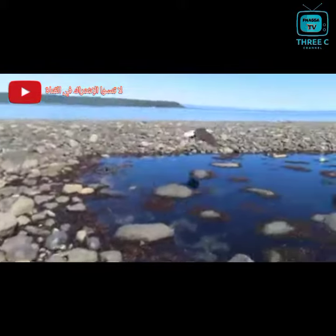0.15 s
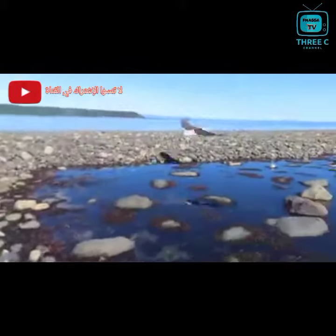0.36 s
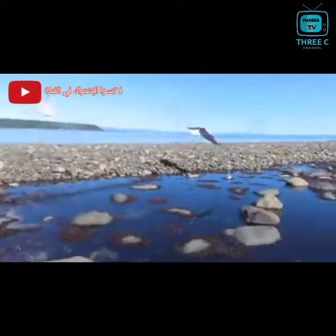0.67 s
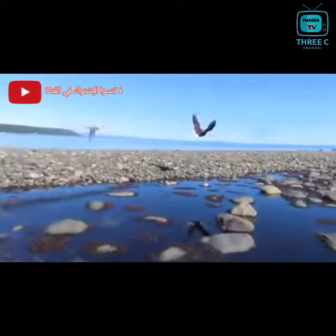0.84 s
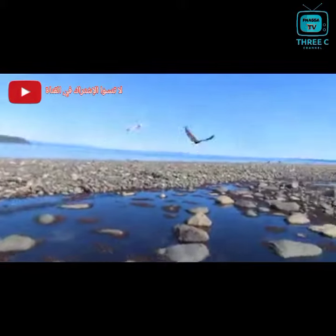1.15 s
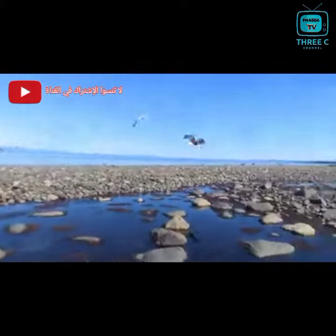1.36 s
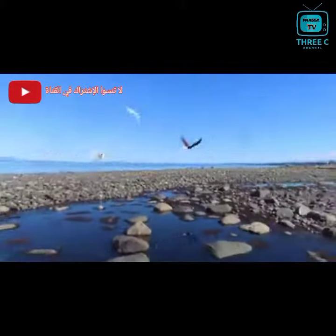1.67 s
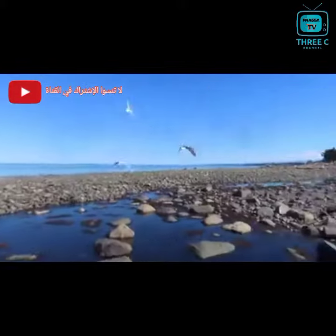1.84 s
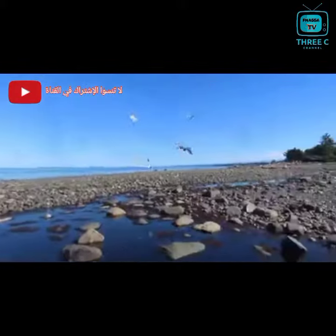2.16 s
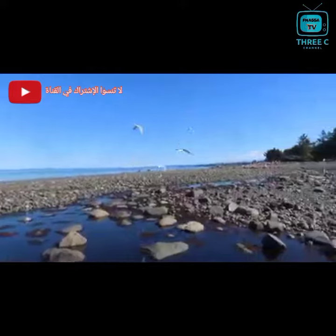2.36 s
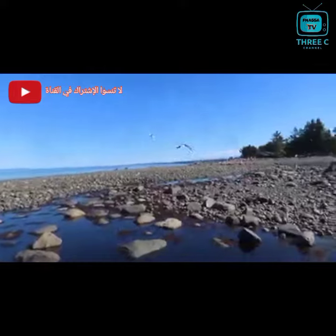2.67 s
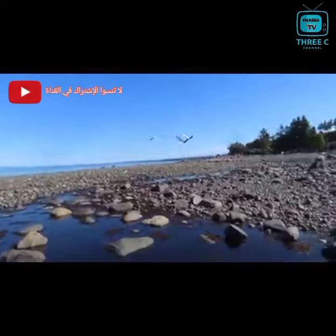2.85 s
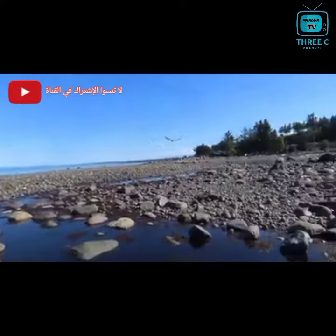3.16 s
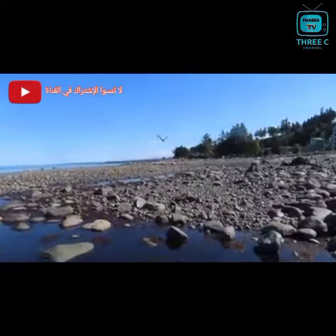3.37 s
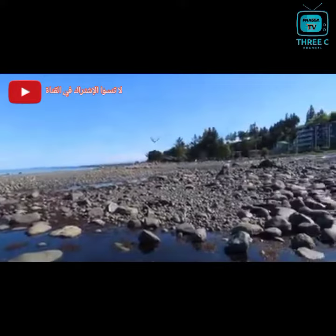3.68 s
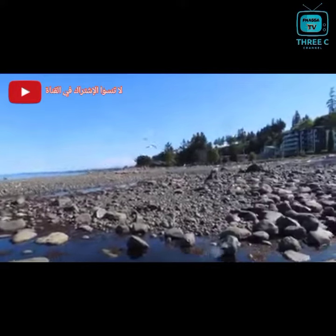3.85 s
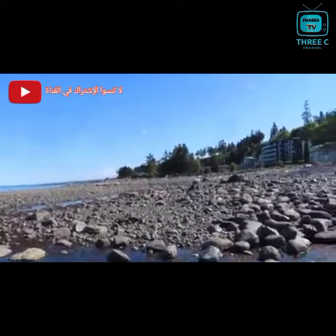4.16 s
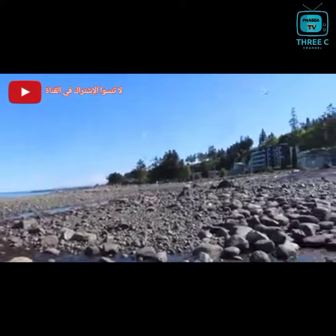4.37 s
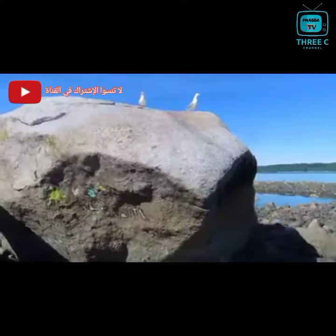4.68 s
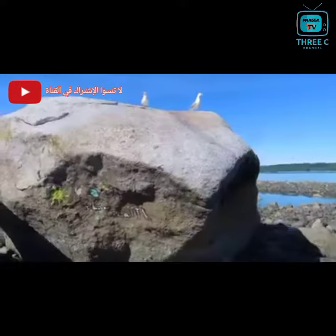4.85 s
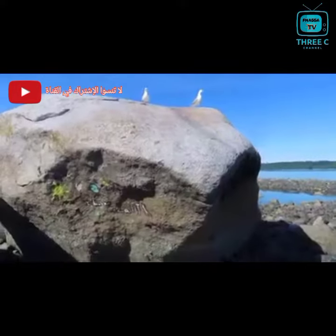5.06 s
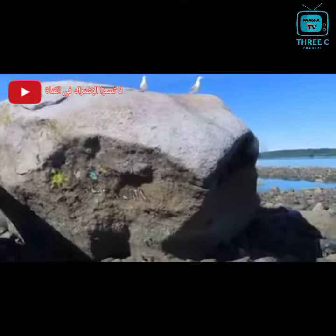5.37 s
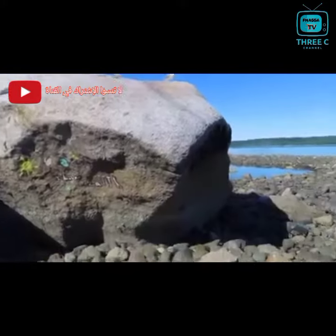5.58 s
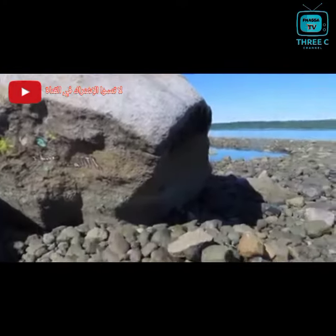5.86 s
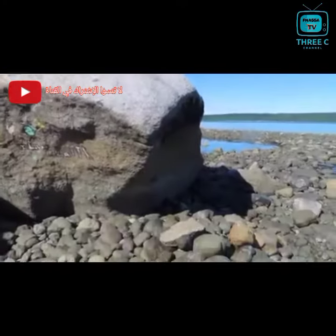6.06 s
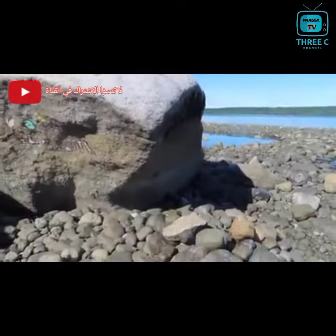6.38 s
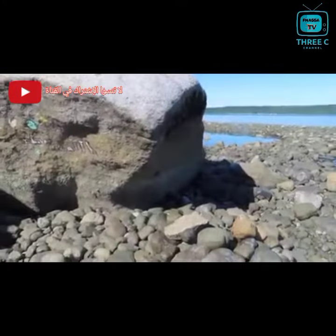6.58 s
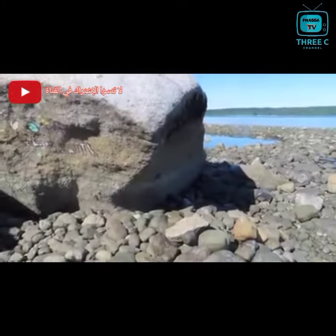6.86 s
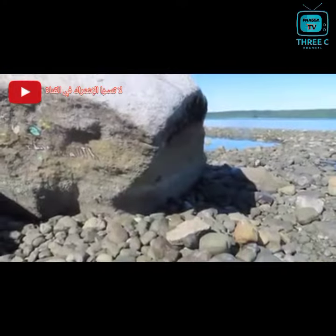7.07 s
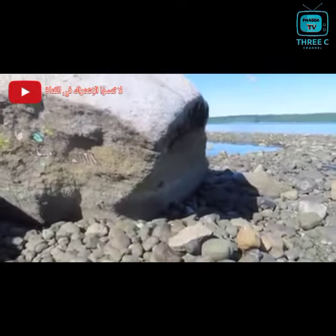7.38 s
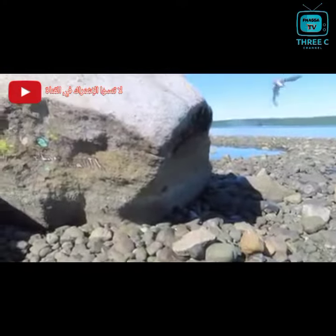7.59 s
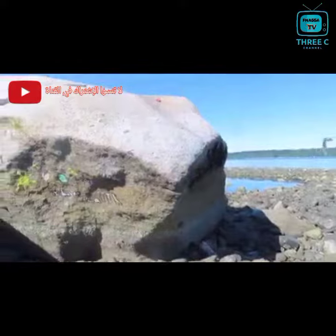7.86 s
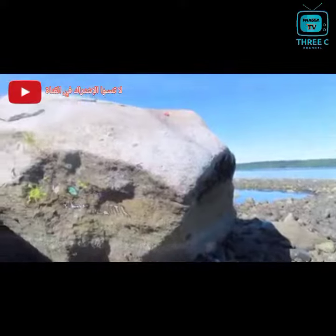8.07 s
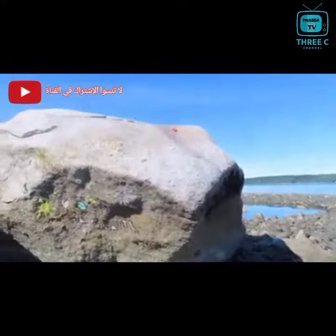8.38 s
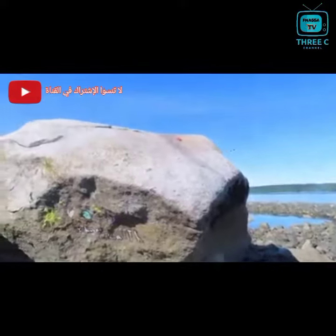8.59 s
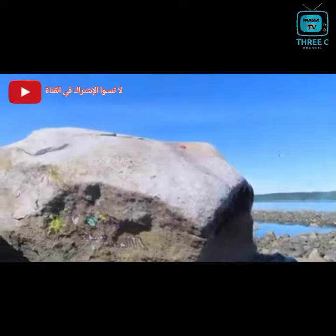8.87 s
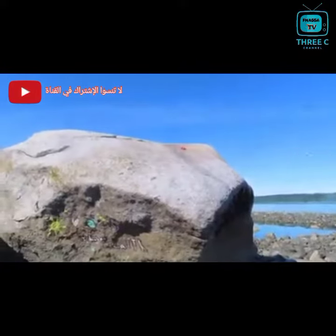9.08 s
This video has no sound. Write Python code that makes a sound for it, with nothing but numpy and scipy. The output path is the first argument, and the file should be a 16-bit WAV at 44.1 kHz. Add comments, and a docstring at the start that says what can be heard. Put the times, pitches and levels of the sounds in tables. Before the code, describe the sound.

Gulls cry in raspy, falling calls over a calm pebble shore with wind buffets, then after a brief cut a low motor drones beneath.

```python
"""Gulls cry over a pebble shore, often two at once: some cries start raspy and then clear, others snap on clear;
most fall in pitch. Every cry is a harmonic series shaped by the throat; filtered noise forms its echo, the wash
of a calm sea and the wind buffeting the microphone. After a short near-silent cut the listener stands by a boulder:
a motor, probably a boat's, drones in low harmonics until its level drops, under a faint whistle and one tick."""
import sys
import numpy as np
from scipy import signal
from scipy.fft import rfft, irfft, next_fast_len
from scipy.io import wavfile
from scipy.ndimage import uniform_filter1d

SR = 44100
rng = np.random.default_rng(int(sys.argv[2]) if len(sys.argv) > 2 else 0)


def pcm_store(signal):
    """Save signal as 16-bit PCM."""
    levels = np.round(np.clip(np.atleast_2d(signal), -1, 1) * 32767)
    wavfile.write(sys.argv[1], SR, levels.astype(np.int16).T)


N = 407043
TIME = np.arange(N) / SR
CUT_START_S, CUT_END_S, TICK_S = 4.63, 4.824, 6.7935
TOP_HZ = 15500

# Spectra of sea, flutter, rumble, turbulence and hiss are relative: their noise is scaled to rms 1.
# sea on the open shore and by the boulder: freq_hz, density_db
SEA_OPEN_SPECTRUM = [(24, -46.5), (40, -29.5), (80, -3), (174, -7), (218, -11.5), (461, -25.5),
                     (522, -20.5), (1020, -18.5), (1160, -19.5), (1410, -18), (1730, -28), (3140, -32.5),
                     (3470, -39), (15500, -62)]
SEA_BOULDER_SPECTRUM = [(210, -12), (350, -6), (488, -7.5), (936, -4.5), (1460, -11), (1760, -14.5),
                        (1940, -17), (2270, -20), (2890, -26), (4570, -31.5), (5890, -38), (8620, -43),
                        (15500, -62)]
SEA_OPEN_DB, SEA_BOULDER_DB = -38, -39.5
# hiss of water: freq_hz, density_db
HISS_SPECTRUM = [(800, 0.5), (2500, 12), (5000, 5), (9000, -2), (13000, -10.5), (16000, -21.5)]
# strength of the wash: time_s, gain_db
WASH_STRENGTH = [(0, 2.5), (.6, 0), (2, -6), (3, 2), (4.6, 1), (7.5, -1), (9.2, 0.6)]
# soft swells of hiss: centre_s, half_length_s, level_db
HISS_SWELLS = [(0.09, 0.093, -48.5), (0.323, 0.068, -50), (0.438, 0.035, -49), (0.574, 0.071, -49),
               (2.909, 0.22, -56.5), (6.02, 0.16, -49.5), (7.453, 0.8, -58.5)]

# wind flutter, deep rumble and gust turbulence: freq_hz, density_db
FLUTTER_SPECTRUM = [(35, -39.5), (60, -25.5), (128, -2), (238, -1), (277, -4), (340, -8), (455, -12.5),
                    (530, -24), (800, -35.5), (1040, -52.5), (1760, -120)]
RUMBLE_SPECTRUM = [(15, -19.5), (40, 12.5), (70, 3.5), (120, 11.5), (200, 4), (400, -44), (1500, -79)]
TURBULENCE_SPECTRUM = [(20, -18.5), (45, -7.5), (100, -6), (180, -5.5), (300, -13), (500, -35),
                       (3000, -89.5)]
# steady breeze, each row holding until the next: start_s, flutter_db, rumble_db
BREEZE_LEVELS = [(0, -56.5, -66), (4.7, -42.5, -42.5), (8.21, -37.5, -54)]
# gusts: centre_s, half_length_s, flutter_db, rumble_db, turbulence_db (at each port)
GUST_EVENTS = [ (1.1, 0.21, -45.5, -47, -81), (2.634, 0.15, -35, -43, -65), (2.829, 0.085, -24.5, -46, -57),
               (3.083, 0.096, -27.5, -41, -58), (3.436, .22, -32, -56, -70), (3.975, 0.082, -35, -45, -70),
               (4.12, 0.071, -53, -35, -74), (4.592, .14, -44.5, -41, -66), (4.95, 0.22, -33.5, -45, -34.5),
               (5.45, 0.51, -37.5, -56, -59), (5.75, 0.11, -44, -52, -42), (6.72, 0.092, -45, -36, -34),
               (7.1, 0.054, -50, -46, -39), (7.763, 0.068, -32.5, -39, -22), (8.064, 0.11, -38, -34, -22),
               (8.18, 0.024, -28, -45, -12), (8.98, 0.21, -21.5, -38, -54), (9.2, 0.091, -34, -50, -54), ]
# single buffets: start_s, peak_db, pitch_hz, length_s
BUFFET_EVENTS = [(2.659, -18.5, 226, 0.01), (2.805, -16, 191, 0.032), (3.422, -20.5, 228, 0.027),
                 (3.49, -27, 198, 0.011), (3.61, -20, 208, 0.015), (7.748, -10.5, 85.4, 0.053),
                 (8.028, -11.5, 93, 0.1), (8.698, -15, 213, 0.023)]

# thin far whistle: time_s, pitch_hz, level_db
WHISTLE_TRACK = [(4.8, 4600, -67), (5.2, 4560, -64), (5.9, 4550, -60), (6.1, 4550, -84), (8.55, 4490, -84),
                 (8.75, 4490, -58), (9.2, 4500, -77)]
# the motor: time_s, cycle_rate_hz, level_db
MOTOR_TRACK = [(4.8, 18.8, -18.5), (5.5, 20.1, -23), (6, 18.4, -22.5), (6.8, 17.3, -18), (7.5, 17.1, -18.5),
               (8, 18.1, -22.5), (8.2, 18.6, -16), (8.22, 18.4, -31.5), (9.23, 18.6, -32)]
# motor harmonics: multiple (of the cycle rate), level_db (relative)
MOTOR_HARMONICS = [(3, -17), (4, -7.5), (5, -4.5), (6, -13.5), (7, -6.5), (8, -13.5), (9, -15), (10, -18),
                   (11, -22.5), (12, -22.5), (14, -24.5)]
# exhaust rumble: freq_hz, density_db
EXHAUST_SPECTRUM = [(25, -27.5), (60, 0.5), (160, -2.5), (240, -13), (500, -34.0), (1500, -78.5)]
# crack and bright rattle of the tick: freq_hz, density_db
CRACK_SPECTRUM = [(300, 2), (1200, 1), (2600, 3.5), (5000, -9), (10000, -7.5), (16000, -23)]
RATTLE_SPECTRUM = [(5000, -5), (9000, 2), (15000, -15)]

# one row per voice of a cry: start_s, rise_s, fall_s, crest_hz, end_hz, fall_bend (1 straight, higher = later),
# level_db, fade_db (by the end), beak_db (opening), edge_db (of the voice), gape_db (wider in mid-fall),
# rasp_s (opening), hoarseness (0-1), leap_after_s, leap_for_s
CRY_VOICES = [ (0.0, 0.0023, 0.14, 1297, 930, 1.25, -22.5, 18.7, 14.5, 18, -5.5, 0.00071, 0.29, 0, 0),
              (0.656, 0.042, 0.19, 1402, 1130, 2.43, -17, 1, 15, 17, -6.5, .033, 0.13, .09, .2),
              (.67, 0.032, .245, 1357, 954, 2.8, -18, 9.4, 8, 11, 1, 0.029, 0.14, 0, .19),
              (.962, 0.022, 0.031, 1700, 1530, 0.53, -23, 16, 3.5, 13.5, -1.5, 0.019, 0.36, 0, 0.0041),
              (1.04, 0.0038, .19, 1496, 1084, 2.07, -24, 10.7, 6.5, 10, 3, 0.0044, 0, 0, 0),
              (1.334, 0.045, 0.23, 1302, 945, 2.7, -13.5, 14, 12.5, 19, -7, 0.042, 0.027, 0, 0.053),
              (2.168, 0.032, .222, 1303, 946, 3.55, -16, 13, 4, 0, 1.5, 0.046, 0.05, .124, 0.16),
              (2.276, 0.0084, 0.26, 1562, 1190, 2.47, -20, 18, -1.5, -8.5, 15, 0.047, 0.01, 0, 0),
              (3.005, 0.033, 0.016, 1650, 1590, 1, -32.5, 6, 7, -7, -2, 0.023, 0.6, 0, 0.0036),
              (3.058, 0.0019, 0.21, 1582, 1270, 1.57, -23.5, 16.4, 2.5, -8.5, 18.5, 0.0035, 0.07, 0, 0),
              (3.155, 0.1, .15, 1328, 950, 3.1, -27.5, 5, 10.5, 2.5, -3, 0.031, 0.21, 0, 0),
              (3.27, .02, 0.063, 1533, 1390, 2.2, -20.5, 2, 3.5, -10, 0, .002, 0.01, 0, 0),
              (3.496, 0.0054, .075, 1527, 1460, 2.7, -36, 13.5, -2.5, 1, 0, .002, 0.027, 0, 0),
              (3.585, 0.0054, .092, 1340, 1090, 1, -32, 11, 2.5, -11, 0, 0.018, .05, 0, 0.012),
              (3.728, 0.026, 0.017, 1630, 1620, 1.2, -41, 12, 7, 3, 0, .008, 0.7, 0, 0),
              (3.767, 0.0031, 0.21, 1553, 1275, 1.13, -25.5, 10, 1, -12, 9, 0.0096, 0.1, 0, 0),
              (4.095, 0.0048, .14, 1312, 997, .9, -33, 14, -1, 4, -1, 0.019, .08, 0, 0),
              (4.15, .005, .09, 1470, 1330, 1.5, -50, 6, 11, 20, 4, .005, .1, 0, 0.025),
              (4.613, 0.034, 0.015, 1396, 1390, 1, -38, 2.5, 0, -2.5, 2, 0.0064, 0.86, 0, 0),
              (4.821, 0.0031, 0.12, 1073, 760, 1.57, -17.5, 18.7, -1.5, 5.5, -1.5, .002, 0.14, 0, 0),
              (5.255, 0.092, 0.12, 1124, 803, 2.05, -15.5, 25, 2, -6.5, 1.5, 0.066, 0.066, .095, .13),
              (5.308, 0.074, .13, 1094, 765, 1.84, -18.5, 16, 2, 6, -3.5, 0.035, .05, 0, 0),
              (6.26, 0.095, .11, 1131, 760, 2.06, -15.5, 15, 6, 9.5, -7, 0.045, 0.017, 0, 0.0031),
              (8.189, .1, .128, 1320, 941, 0.95, -24.5, 8, 13, 12.5, -12, 0.048, 0.38, 0, 0.0061),
              (8.876, 0.028, 0.064, 1448, 1380, 0.67, -21, 2, 5, 7.5, -3, 0.033, 0.32, 0, 0),
              (8.947, .012, .12, 1584, 1363, 1.57, -25, 4, 6, 4, 0.5, .012, 0.1, 0, 0),
              (9.076, .003, 0.039, 1060, 970, 1, -34, 3, -6.5, -2, -1, .003, 0.4, 0, 0), ]
# resonances of a gull's throat: freq_hz, gain_db
THROAT_RESONANCE = [(700, 3.5), (1600, 0), (2100, -7), (2600, -17.5), (3200, -10.5), (4000, -25.5),
                    (5100, -35), (6200, -42), (7500, -49), (9000, -56), (11500, -56.5), (15000, -81.5)]
# beaming of the highest partials, by the way a bird faces: time_s, gain_db
FACING_BRIGHTNESS = [(0, 4), (1.5, -4), (2.2, -3.5), (4.3, -5), (4.8, 11.5), (6.4, 9), (8.2, -3),
                     (9.1, -4.5)]
# where the birds are: time_s, left_lead_samples, shade_db (treble, left minus right)
BIRD_BEARING = [(0, 1.5, -3.5), (.7, 2.5, -4.5), (.96, 0.6, 1), (1.33, 2.5, -4), (2.1, -1.5, -1.5),
                (6.3, -3, -1), (8.18, -2, .3)]
# colour of the beach's echoes: freq_hz, density_db
ECHO_SPECTRUM = [(300, -11), (1000, -12.5), (3200, 11.5), (6000, 9), (15000, -25.0)]
SCOOP_PER_S = 1.7  # a cry starts below its crest by this share per second of rise
LEAP = 1.13  # pitch ratio of the upper register
ONSET_DB = 18.5  # how far below full level the onset starts
FADE_BEND = 2.46  # the breath holds, then gives out
DYING_DB, DYING_BEND = 9, 11  # the last moment of a cry dies away quickly
BEAK_CLOSING, EDGE_SOFTENING = 0.66, 0.7  # dB of brightness lost per dB of effort lost
END_HOARSENESS = 0.28  # the voice frays as the breath gives out
GAPE_PEAK = 0.64  # share of the fall at which the gape is widest


def undb(db):
    """An amplitude ratio is ten to the power of its decibels over twenty."""
    return 10 ** (np.asarray(db) / 20)


def curve(rows, t=TIME):
    """Linear interpolation in time turns a table's columns into continuous quantities."""
    s, *columns = np.transpose(rows)
    return [np.interp(t, s, column) for column in columns]


def spectrum_db(points, hz):
    """A spectrum is interpolated linearly in decibels over logarithmic frequency."""
    f, db = np.transpose(points)
    return np.interp(np.log(np.maximum(hz, 1)), np.log(f), db)


def noise(points, size=N):
    """Filtering white noise by a spectrum gives coloured noise, here of rms 1."""
    n = next_fast_len(size)
    gain = undb(spectrum_db(points, np.fft.rfftfreq(n, 1 / SR)))
    coloured = irfft(rfft(rng.standard_normal(n)) * gain, n)[:size]
    return coloured / coloured.std()


def stereo_noise(points, side_db):
    """A shared noise plus an antiphase side noise sets the coherence of the two channels."""
    side = undb(side_db) * np.array([[1], [-1]])
    return noise(points) + side * noise(points)


def walk(rate, size=N):
    """Random levels, one each 1 / rate s, are joined by ramps into a slow fluctuation of spread near 1."""
    k = max(int(SR / rate), 1)
    held = np.repeat(rng.standard_normal(size // k + 2), k)
    slewed = np.sqrt(3 / 2) * uniform_filter1d(held, k)
    return slewed[rng.integers(k):][:size]


def bell(s, half):
    """A Gaussian envelope rises and falls smoothly around one moment."""
    return np.exp(-((TIME - s) / half) ** 2)


def sea(fizz_db=-67, lap_db=1.02):
    """Many small far waves sum to broadband noise; now and then a soft hiss swells."""
    wash_db, = curve(WASH_STRENGTH)
    open_shore = undb(SEA_OPEN_DB) * stereo_noise(SEA_OPEN_SPECTRUM, -44.0)
    boulder = undb(SEA_BOULDER_DB) * stereo_noise(SEA_BOULDER_SPECTRUM, -27.5)
    place = np.where(TIME < CUT_END_S, open_shore, boulder)
    wash = place * undb(wash_db + lap_db * walk(9))
    swell = sum(undb(db) * bell(s, half) for s, half, db in HISS_SWELLS)
    hiss = swell * stereo_noise(HISS_SPECTRUM, -14.5) * undb(1.4 * walk(60))
    # unrelated channels: a faint fizz of water from all around
    fizz = undb(fizz_db) * np.array([noise(HISS_SPECTRUM), noise(HISS_SPECTRUM)])
    return wash + fizz + hiss


def wind_strength():
    """Incoherent powers add, gust upon breeze: gains of flutter, deep rumble and port turbulence."""
    power = np.zeros((3, N))
    for s, flutter_db, rumble_db in BREEZE_LEVELS:
        power[:2, max(int(s * SR), 0):] = undb([[flutter_db], [rumble_db]]) ** 2
    for s, half, *levels_db in GUST_EVENTS:
        power += np.outer(undb(levels_db), bell(s, half)) ** 2
    return np.sqrt(power)


def wind(flutter, rumble, flutter_trim_db=-1, eddy_db=4.0):
    """Eddies flutter with a small difference between ports; deep rumble is common, and single buffets thump."""
    out = stereo_noise(FLUTTER_SPECTRUM, -27.0) * flutter * undb(flutter_trim_db + eddy_db * walk(35))
    out += noise(RUMBLE_SPECTRUM) * rumble
    for s, db, hz, length in BUFFET_EVENTS:
        age = np.arange(int(length * SR)) / SR
        unsteady_hz = hz * (1 + 0.31 * walk(150, len(age)))
        swing = np.sin(2 * np.pi * np.cumsum(unsteady_hz) / SR)
        thump = undb(db) * swing * np.sqrt(np.sin(np.pi * age / length))
        start = int(s * SR)
        port_gain = undb(0.53 * rng.standard_normal((2, 1)))
        out[:, start:start + len(age)] += thump * port_gain
    return out


def gusts(strength):
    """Local turbulence is incoherent between the two ports."""
    return np.array([noise(TURBULENCE_SPECTRUM), noise(TURBULENCE_SPECTRUM)]) * strength


def whistle(waver=0.011, flicker_db=3):
    """Random frequency and amplitude modulation make a thin far tone unsteady."""
    hz, db = curve(WHISTLE_TRACK)
    tone = np.sin(2 * np.pi * np.cumsum(hz * (1 + waver * walk(150))) / SR)
    return tone * undb(db + flicker_db * walk(17))


def motor(exhaust_db=-10, waver_db=2.5, wobble=0.091):
    """Uneven cylinders excite low multiples of the cycle rate, each wavering on its way over the water."""
    hz, db = curve(MOTOR_TRACK)
    phase = 2 * np.pi * np.cumsum(hz) / SR
    drone = 0
    for k, line_db in MOTOR_HARMONICS:
        gain = undb(line_db + waver_db * walk(5))
        drone = drone + gain * np.sin(k * phase + wobble * k / 4 * walk(12) + rng.normal(0, 1.0))
    # the exhaust rumbles between the lines, swelling once a cycle
    exhaust = stereo_noise(EXHAUST_SPECTRUM, -37.5) * (1 + 0.49 * np.cos(phase))
    return (np.sqrt(2) * drone + undb(exhaust_db) * exhaust) * undb(db)


def tick(click_db=-21, overlap_db=-31, ring_db=-41):
    """Overlapping short noise bursts form one sharp tick close to the microphone and its bright rattle."""
    bursts = (  # delay_s, length_s, level_db, colour
        (0.00037, 0.0048, click_db, CRACK_SPECTRUM),
        (0.00055, 0.0025, overlap_db, CRACK_SPECTRUM),
        (0.001, 0.019, ring_db, RATTLE_SPECTRUM))
    out = np.zeros(N)
    for delay, length, db, colour in bursts:
        start, n = int((TICK_S + delay) * SR), int(length * SR)
        out[start:start + n] += undb(db) * noise(colour, size=n) * np.sqrt(np.hanning(n))
    return out


def ports(sound, lead, shade_db):
    """Interaural-like cues of two close ports: the treble reaches one of them sooner, and one louder."""
    size = 2 * next_fast_len(len(sound))
    hz = np.fft.rfftfreq(size, 1 / SR)
    # the case shades mainly a middle band; lows arrive alike and the very top nearly so
    band = np.interp(hz, [1000, 2700, 4500, 7500], [0, 1, 0.8, 0.12])
    treble = band * np.array([[0.5], [-0.5]])
    advance = np.exp(2j * np.pi * treble * hz * lead / SR)
    return irfft(rfft(sound, size) * undb(treble * shade_db) * advance, size)


def shore(x, scatter_db=-19, scatter_t60=0.3, tail_db=-31, tail_t60=0.63):
    """Convolution with decaying noise: stones scatter quick echoes, the wide beach returns a faint tail."""
    t = np.arange(SR // 2) / SR
    out = []
    for _ in range(2):  # one response per channel
        response = 0
        for db, t60 in ((scatter_db, scatter_t60), (tail_db, tail_t60)):
            decay = np.exp(-np.log(1000) * t / t60)
            echoes = noise(ECHO_SPECTRUM, size=len(t)) * decay * (t > 0.004)
            response = response + undb(db) * echoes / np.linalg.norm(echoes)
        out.append(signal.fftconvolve(x, response)[:N])
    return np.array(out)


def gesture(row):
    """Breath drives pitch and timbre: a voice starts briefly or long raspy, crests, may leap, sinks and dulls."""
    (start, rise, fall, crest_hz, end_hz, bend, db, fade_db, beak_db, edge_db, gape_db,
     rasp, hoarse, leap_after, leap_for) = row
    age = np.arange(int((rise + fall) * SR)) / SR
    rising = np.clip(1 - age / rise, 0, 1)
    falling = np.clip((age - rise) / fall, 0, 1)
    leaping = (age >= leap_after) & (age < leap_after + leap_for)
    register = uniform_filter1d(1. * leaping, size=300)
    glide_hz = crest_hz + (end_hz - crest_hz) * falling ** bend
    hz = glide_hz * (1 - SCOOP_PER_S * rise * rising ** 3) * LEAP ** register
    unsettled = np.exp(-(age / rasp) ** 2)
    spent = falling ** FADE_BEND
    effort_db = -ONSET_DB * unsettled ** 3 - fade_db * spent - DYING_DB * falling ** DYING_BEND
    hoarse = hoarse + (1 - hoarse) * unsettled + END_HOARSENESS * spent
    gape = gape_db * np.sin(np.pi / 2 * falling / GAPE_PEAK)
    beak = beak_db + gape + BEAK_CLOSING * effort_db
    edge = edge_db + gape + EDGE_SOFTENING * effort_db
    return start + age, hz, db + effort_db, beak, edge, hoarse


def cry(row, jitter=0.0075, rasp=0.02, half_db=-6, breathy_db=-31, shimmer_db=2.0, chaos_db=6,
        patchy_db=3.0, fading_db=1.83, attack_s=0.0011, swell_s=0.0042, release_s=0.0043):
    """A syrinx sounds through the throat; hoarseness doubles its period and, at the extreme, turns to chaos."""
    t, hz, db, beak_db, edge_db, hoarse = gesture(row)
    hoarse, n = np.clip(hoarse, 0, 1), len(t)
    chaos = hoarse ** 3
    facing_db, = curve(FACING_BRIGHTNESS, t)
    hz = hz * (1 + jitter * walk(170, n) + (rasp * hoarse ** 2 + jitter) * walk(900, n))
    phase = 2 * np.pi * np.cumsum(hz) / SR
    out = np.zeros(n)
    for k in np.arange(1, 25) / 2:
        f = k * hz
        upper = np.clip((f - 3400) / 700, 0, 1)
        brightness_db = (1 - upper) * beak_db + upper * edge_db
        gain_db = spectrum_db(THROAT_RESONANCE, f) + np.clip(k - 1, 0, 1) * brightness_db
        gain_db = gain_db + facing_db * np.clip((f - 5300) / 1200, 0, 1)
        # each partial comes and goes by itself, the high ones most
        flicker_db = (upper * patchy_db + (1 - upper) * fading_db) * walk(35.5, n)
        gain = undb(gain_db + flicker_db) * (f < TOP_HZ)
        if k % 1:  # half lines, weak below the throat's first resonance
            half_gain = undb(half_db * (1.5 - chaos)) * np.minimum(2 * hoarse, 1) ** 3
            gain = gain * half_gain * (0.2 if k < 1 else 1)
        # turbulence puts a skirt of noise around each line; in chaos only the skirt is left
        skirt = undb(breathy_db) * k ** 0.75 * (1 + 3 * hoarse) + undb(chaos_db) * chaos * hoarse / 2
        line = np.sqrt(1 - chaos) + skirt * (walk(800, n) + 1j * walk(800, n))
        out += gain * np.real(line * np.exp(1j * (k * phase + rng.uniform(0, 2 * np.pi))))
    # raspy starts swell, clear ones snap on
    attack = np.minimum((t - t[0]) / (attack_s + swell_s * hoarse ** 2), 1)
    release = np.minimum((t[-1] - t) / release_s, 1)
    return np.sqrt(2) * out * attack * release * undb(db + shimmer_db * walk(89.7, n))


def gulls():
    """Superposition of all cries, each placed at its bearing, with their echo from the beach."""
    out = np.zeros((2, N))
    for row in CRY_VOICES:
        sound = ports(cry(row), *curve(BIRD_BEARING, row[0]))
        start = max(int(row[0] * SR), 0)
        out[:, start:start + sound.shape[1]] += sound[:, :N - start]
    return out + shore(out.mean(axis=0))


def scene():
    """Sources superpose linearly in both places, strongly attenuated during the cut between them."""
    flutter, rumble, turbulence = wind_strength()
    background = sea() + wind(flutter, rumble) + gusts(turbulence)
    by_boulder = (motor() + whistle()) * (TIME > CUT_END_S)
    sound = background + by_boulder + tick() + gulls()
    live = uniform_filter1d(1. * ((TIME < CUT_START_S) | (TIME > CUT_END_S)), size=64)
    return sound * np.maximum(live, undb(-45.5))


def record(dry):
    """An elliptic low-pass filter limits the bandwidth to TOP_HZ."""
    return signal.sosfilt(signal.ellip(8, .2, 70, TOP_HZ, fs=SR, output="sos"), dry)


dry = scene()
out = record(dry)
pcm_store(out)
```